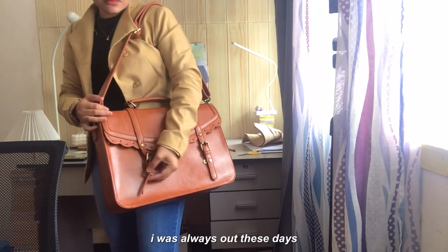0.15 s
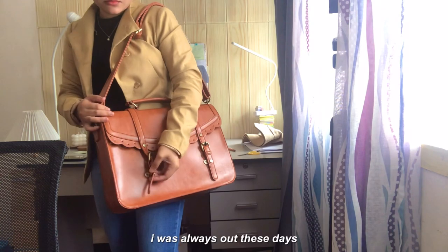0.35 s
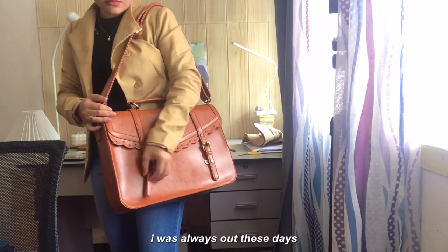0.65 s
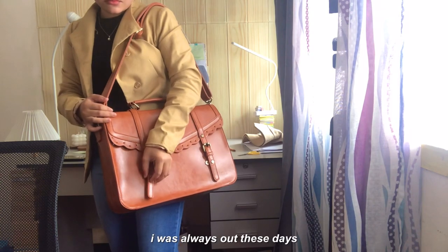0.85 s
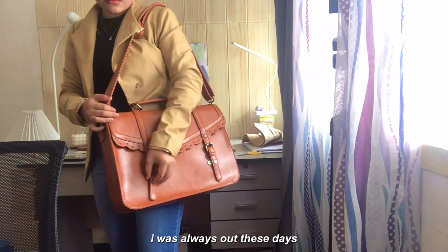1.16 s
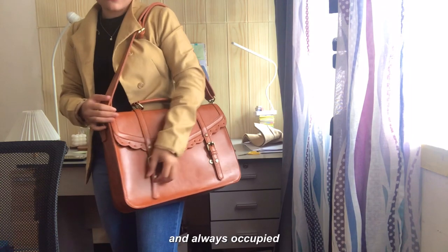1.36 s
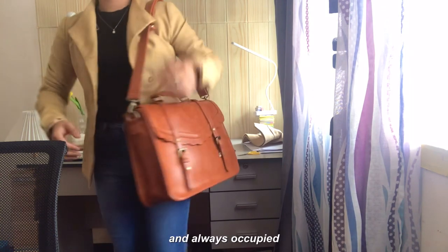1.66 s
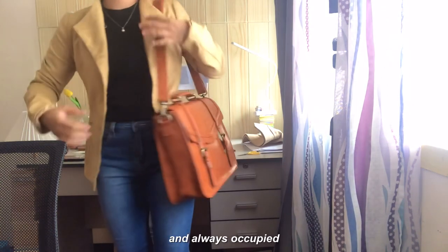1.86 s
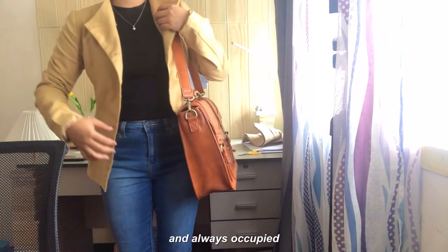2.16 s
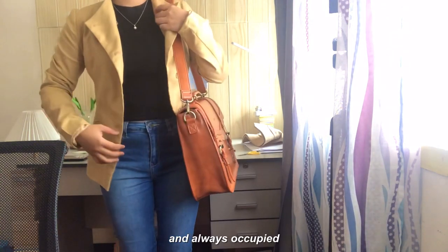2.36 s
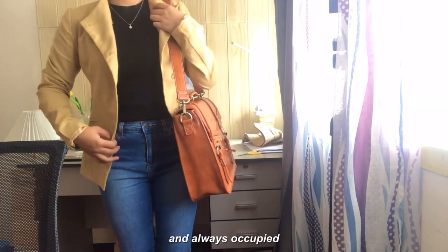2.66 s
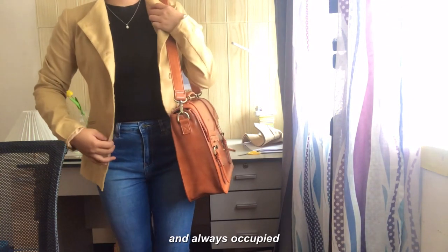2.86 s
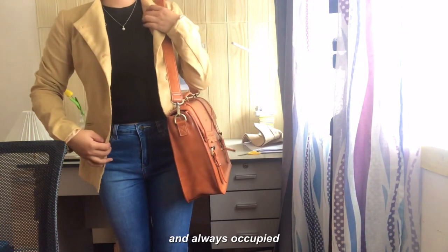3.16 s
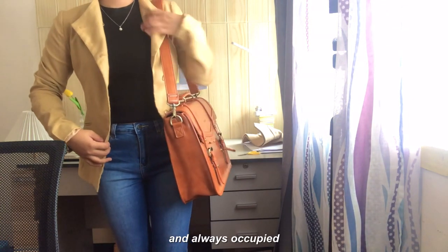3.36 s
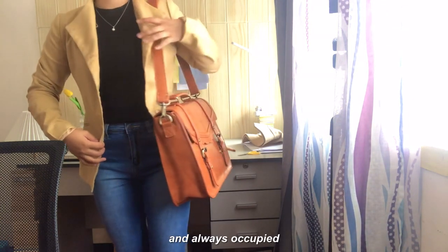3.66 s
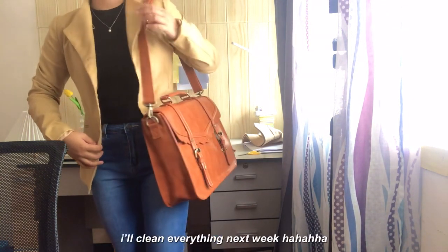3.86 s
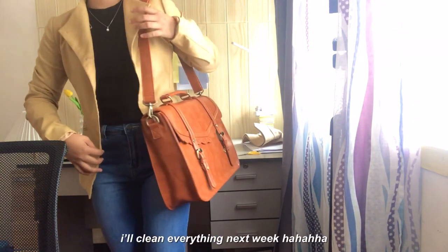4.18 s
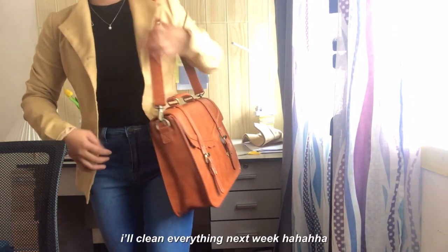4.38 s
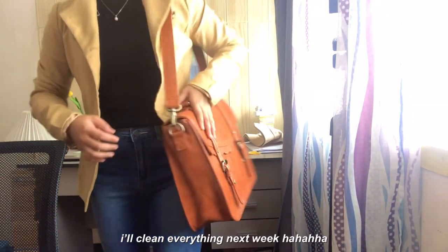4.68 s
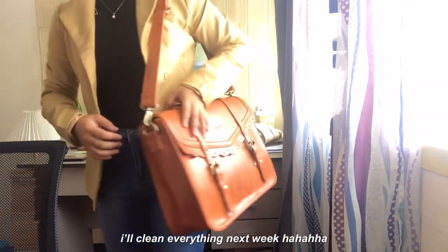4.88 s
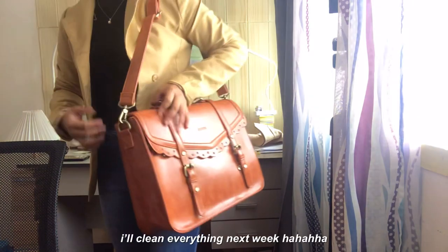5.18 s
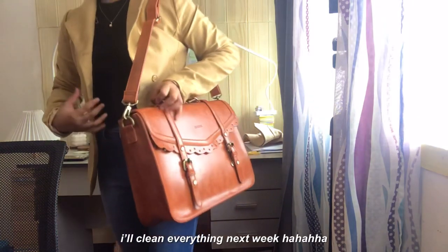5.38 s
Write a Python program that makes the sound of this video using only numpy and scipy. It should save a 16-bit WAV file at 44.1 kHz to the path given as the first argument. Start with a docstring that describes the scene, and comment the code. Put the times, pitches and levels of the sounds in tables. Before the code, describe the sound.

Leather and cloth rustle, a magnetic clasp snaps loudly, then small metal ticks and bumps follow over a rattling fan and sparse rising chirps.

```python
"""A slow four-blade ceiling fan runs throughout: its hum wavers round each turn and its mount rattles.
Within the first second leather creaks, cloth brushes and small metal parts of a leather bag tick.
Just after one second the clasp snaps shut and a bird outside begins to chirp. The bag is then swung
round with more ticks, brushes and bumps, while chirps and fainter peeps return until near the end.
Tones are trembling sine waves; rattles, ticks and rubbing are filtered noise; the thud is fading sines."""
import sys
import numpy as np
from scipy import signal
from scipy.fft import rfft, irfft, next_fast_len
from scipy.io import wavfile
from scipy.ndimage import uniform_filter1d

SR = 44100
rng = np.random.default_rng(int(sys.argv[2]) if len(sys.argv) > 2 else 0)


def pcm_store(signal):
    """Save signal as 16-bit PCM."""
    levels = np.round(np.clip(np.atleast_2d(signal), -1, 1) * 32767)
    wavfile.write(sys.argv[1], SR, levels.astype(np.int16).T)


N = 243873  # length in samples

TURN_HZ = 1.994  # turns of the fan per second
CLASP_S = 1.1088  # moment of the snap


def undb(db):
    """Turn decibels into a gain."""
    return 10 ** (np.asarray(db) / 20)


def unit(x):
    """Scale to an average (rms) level of 1."""
    return x / np.sqrt(np.mean(x ** 2))


def colour(x, points):
    """Shape the spectrum by (Hz, dB) points joined on a log-frequency axis."""
    hz, db = np.transpose(points)
    size = next_fast_len(len(x))
    f = np.arange(size // 2 + 1) * SR / size
    gain = undb(np.interp(np.log(f + 1), np.log(hz), db))
    return irfft(rfft(x, size) * gain, size)[:len(x)]


def band(x, hz, width_hz):
    """Let through one resonance, with gain 1 at its centre."""
    b, a = signal.iirpeak(min(hz, .45 * SR), hz / width_hz, SR)
    return signal.lfilter(b, a, x)


def steep(x, hz, width_hz):
    """Apply the same resonance twice, so its sides fall faster."""
    return band(band(x, hz, width_hz), hz, width_hz)


def walk(rate):
    """Random wandering with rms 1: levels held for 1 / rate seconds, then smoothed twice."""
    hold = int(SR / rate)
    steps = np.repeat(rng.standard_normal(N // hold + 1), hold)
    return unit(uniform_filter1d(uniform_filter1d(steps, hold), hold)[:N])


def grit(spread_db):
    """Noise in which single samples now and then stand out like small slips."""
    return unit(rng.standard_normal(N) * undb(spread_db * rng.exponential(size=N)))


def bursts(times, levels_db, rise_s, fade_s):
    """Loudness curve: each event rises fast and dies by 60 dB in its fade time."""
    t = np.arange(N) / SR
    out = np.zeros(N)
    for s, db, fade in zip(times, levels_db, np.broadcast_to(fade_s, len(times))):
        on = slice(int(s * SR), int((s + fade) * SR))
        age = np.maximum(t[on] - s, 0)
        out[on] += undb(db - 60 * age / fade) * (1 - np.exp(-age / rise_s))
    return out


def swells(rows):
    """Loudness curve: each gesture swells to its peak and fades."""
    swell_db = 22.5  # drop from the peak, one rise before it and one fall after it
    t = np.arange(N) / SR
    out = np.zeros(N)
    for s, rise, fall, db in rows:
        distance = np.where(t < s, (s - t) / rise, (t - s) / fall)
        out += undb(db - swell_db * distance ** 2)
    return out


def spans(tables, column):
    """Gain of one dB column over time, silent between the tables."""
    t = np.arange(N) / SR
    gain = np.zeros(N)
    for table in tables:
        columns = np.transpose(table)
        gain += np.interp(t, columns[0], undb(columns[column]), 0, 0)
    return uniform_filter1d(gain, size=400)


def whistle(calls, waver, flutter_db, rate):
    """A near-sine tone whose pitch and level tremble."""
    rows = np.concatenate(calls)
    pitch = np.interp(np.arange(N) / SR, rows[:, 0], rows[:, 1]) * (1 + waver * walk(rate))
    level = spans(calls, column=2) * undb(flutter_db * walk(rate))
    return np.sqrt(2) * level * np.sin(2 * np.pi * np.cumsum(pitch) / SR)


def echo(x, t60, wet_db):
    """Add a diffuse tail of noise that dies by 60 dB in t60 seconds."""
    t = np.arange(int(t60 * SR)) / SR
    tail = rng.standard_normal(len(t)) * undb(-60 * t / t60) * (t > .003)
    return x + undb(wet_db) * signal.fftconvolve(x, tail / np.linalg.norm(tail))[:N]


# tone colour of the steady hiss: pitch_hz, relative level_db (per Hz)
AIR_COLOUR = [(18, -62), (30, -19.5), (70, -6.5), (124, -3), (204, -12.5), (364, -14), (554, -22.5),
              (889, -20.5), (1860, -26), (2120, -27), (4910, -36), (6720, -38.5), (10200, -48.5),
              (14400, -49.5), (16000, -55)]


def air():
    """Room air and microphone hiss; the mids swell a little as each blade sweeps by."""
    noise = unit(colour(rng.standard_normal(N), AIR_COLOUR))
    sweep = np.cos(2 * np.pi * (4 * TURN_HZ * np.arange(N) / SR - .4))
    mids = band(noise, 1350, 2300)
    mids_gain = undb(0.5 * sweep + 1.84 * walk(4.694))
    return undb(-47.5) * (noise + (mids_gain - 1) * mids)


# wavering low drones of noise: pitch_hz, width_hz (of each of two filter passes), level_db
NOISE_DRONES = [(165.6, 3.3, -57.5), (229.6, 12, -63.5)]
# a lower drone near 58 Hz whose level wavers by chance: time_s, relative level_db
LOW_DRONE_LEVEL = [(0, -57), (.36, -65), (.5, -50), (1.09, -51), (1.23, -66), (1.4, -52), (1.68, -55),
                   (1.76, -62), (1.9, -49), (2.17, -50), (2.27, -60), (2.75, -49.5), (3.22, -70),
                   (3.45, -52), (3.82, -64), (4.05, -49), (4.25, -58), (4.53, -47), (4.86, -64),
                   (5.079, -47), (5.25, -50), (5.4, -68)]
# the turning blades split the hum into side tones: distance from the hum (turn rates),
# relative level_db, angle at which it is in step with the hum (turns)
HUM_SIDES = [(-4, -53.5, .209), (-2, -56.8, .248), (-1, -63.3, .924), (1, -59.6, .937), (2, -59.8, .486),
             (3, -59, .257), (4, -55.7, .151), (5, -61.5, .034), (6, -63.6, .152), (7, -59.7, .129),
             (8, -56.3, .009), (10, -65, .08)]


def hum():
    """Motor tone and side tones beat in a pattern that repeats each turn, over low drones."""
    hum_order, hum_db = 60, -46.2  # the motor tone is 60 times the turn rate
    angle = np.arange(N) / SR * TURN_HZ
    tones = np.zeros(N)
    for k, db, at in [(0, hum_db, 0)] + list(HUM_SIDES):
        tones += undb(db) * np.cos(2 * np.pi * (hum_order * angle + k * (angle - at)))
    wander = undb(0.97 * walk(4.57))
    drones = sum(undb(db) * unit(steep(rng.standard_normal(N), hz, width))
                 for hz, width, db in NOISE_DRONES)
    low_rows = [(s, 58, db) for s, db in LOW_DRONE_LEVEL]  # centred on 58 Hz
    low = whistle([low_rows], waver=0.017, flutter_db=1.6, rate=10)
    return np.sqrt(2) * wander * tones + drones + undb(-1.0) * low


# fainter peeps: start_s, length_s, first_pitch_hz, last_pitch_hz, relative level_db
FAINT_PEEPS = [(2.765, .035, 6600, 6720, -64), (3.331, .17, 2888, 2896, -64.5),
               (3.54, .04, 3170, 3180, -68), (4.63, .04, 7200, 6700, -63),
               (5.277, 0.054, 6500, 7400, -66.5)]


def peep(s, length, from_hz, to_hz, db):
    """One short note: a straight glide that rises, holds and fades."""
    edge = .014 / length  # 14 ms to rise and to fade
    u = np.array([0, edge, 1 - edge, 1])
    level_db = db + np.array([-9, -0.5, -2, -7])
    return np.transpose([s + u * length, from_hz + u * (to_hz - from_hz), level_db])


# bird calls: start_s, glide_s, first_pitch_hz, top_pitch_hz, relative level_db
BIRD_CALLS = [(1.174, 0.093, 5310, 7390, -56.5), (2.82, 0.097, 5400, 7180, -56.5),
              (3.9, .11, 5220, 7200, -55.5)]


def chirp(s, glide, low_hz, top_hz, db):
    """One call: the pitch climbs ever faster to the top and rests there while the level fades."""
    attack_s, tail_s = 0.02, 0.029
    sag_db, top_db, faint_db = -2.5, -6, -7
    u = np.linspace(0, 1, 20)
    age = np.append(u * glide, glide + tail_s)
    hz = np.append(low_hz + (top_hz - low_hz) * u ** 2.1, top_hz)
    level_db = np.interp(age, [0, attack_s, 0.96 * glide, glide, age[-1]],
                         [faint_db, 0, sag_db, top_db, top_db + faint_db])
    return np.transpose([s + age, hz, db + level_db])


def birds():
    """Chirps and peeps are trembling whistles that ring in the yard outside."""
    calls = whistle([chirp(*row) for row in BIRD_CALLS], waver=0.0076, flutter_db=3.8, rate=350)
    peeps = whistle([peep(*row) for row in FAINT_PEEPS], waver=.005, flutter_db=3.5, rate=200)
    return undb(-3) * echo(calls + peeps, .2, 2.5)


# ringing modes of the fan's housing:
# pitch_hz, relative width (scaled to Hz by one common factor), relative level_db
MOUNT_MODES = [(1145, 79, 10.5), (1486, 31, 6), (2093, 36, 9), (2830, 168, 2), (3800, 240, -27),
               (4040, 21, -16), (4390, 8.7, -2), (4250, 39, -47.5)]
# what each of the four blades does to the mount, all relative:
# ring of the lowest mode level_db, treble level_db, knock level_db
BLADE_STRENGTHS = [(-16, -22.5, -8), (-14.5, -22.5, -10), (-12, -22.5, 7.5), (-17, -24.5, -5)]
# the blades pass in turn and shake the mount: time_s, relative level_db
BLADE_PASSES = [(.0438, -50), (.157, -39.5), (.274, -39), (.399, -38.5), (.5294, -44.5), (.6494, -40.5),
                (0.7755, -39), (0.899, -35), (1.0355, -42), (1.1594, -40), (1.275, -41.5), (1.3955, -43),
                (1.5288, -46.5), (1.6627, -37), (1.7698, -42), (1.897, -39), (2.0294, -41.5), (2.1631, -40),
                (2.2794, -42), (2.4036, -47.5), (2.537, -44.5), (2.6711, -42), (2.7813, -40), (2.8991, -43),
                (3.0294, -56), (3.165, -44.5), (3.2794, -36), (3.4009, -38.5), (3.5414, -41), (3.666, -38),
                (3.7765, -44.5), (3.9003, -44.5), (4.0198, -42.5), (4.1664, -36), (4.2847, -38),
                (4.401, -41), (4.5453, -42), (4.671, -39.5), (4.7857, -40), (4.9003, -40.5), (5.044, -37.5),
                (5.1711, -41.5), (5.279, -46.5), (5.398, -47), (5.5148, -43.5)]


def mount():
    """Each blade pass sends a short chatter into the modes of the housing, with a knock inside it."""
    s, db = np.transpose(BLADE_PASSES)
    blade = np.array(BLADE_STRENGTHS)[np.arange(len(s)) % len(BLADE_STRENGTHS)]
    uneven = blade + 1.34 * rng.standard_normal(blade.shape)  # no two passes are quite alike
    low_db, treble_db, knock_db = uneven.T
    chatter = grit(2.1) * undb(2.16 * walk(250))
    rattle = bursts(s - .006, db - 1.5, 0.021, 0.14)
    knock = bursts(s + 0.0013, db + knock_db - 6.0, 0.0017, 0.0096)
    shake = chatter * (rattle + knock)
    body = sum(undb(level + 6) * band(shake, hz, 2.39 * width) for hz, width, level in MOUNT_MODES)
    body = body + undb(7) * steep(shake, 1560, 3600)
    # stretching the levels makes the lowest mode favour the hard strikes
    low_hits = bursts(s, 1.474 * (db + low_db) + 54.0, 0.0028, 0.16)
    low = band(chatter * low_hits, 896.3, 24.0)
    treble_hits = bursts(s - .002, db + treble_db, 0.0057, 0.21)
    treble = undb(16) * steep(chatter * treble_hits, 4360, 3500)
    return steep(body, 2560, 7000) + low + treble


# cloth brushes as the bag swings, and one brief rustle right after the tick at 3.283 s: peak_s, rise_s, fall_s,
# relative level_db
CLOTH_BRUSHES = [(.62, 0.087, .12, -61), (.91, .07, .05, -66.5), (.985, .03, 0.049, -61.5),
                 (1.48, 0.1, .06, -65.5), (1.74, 0.066, .11, -59.5), (2.22, .09, 0.14, -68),
                 (3.287, 0.0036, 0.052, -62), (4.175, 0.041, .04, -67), (4.29, 0.096, 0.066, -68),
                 (4.54, .06, 0.086, -65.5), (4.63, .03, .09, -66), (5.235, .08, 0.044, -65)]
# leather creaks and scuffs: peak_s, rise_s, fall_s, level_db
LEATHER_CREAKS = [(.63, .1, 0.11, -46), (.76, .03, .025, -52.5), (1.41, 0.035, .05, -57),
                  (1.49, .05, 0.037, -57.5), (1.69, 0.11, 0.12, -55.5), (3.008, 0.015, 0.074, -44.5),
                  (4.67, 0.095, 0.057, -53.5)]
# the bag bumps hand and hip: peak_s, rise_s, fall_s, relative level_db
BAG_BUMPS = [(.67, 0.23, 0.18, -41.5), (3.03, .05, 0.036, -49), (4.52, 0.046, .03, -53),
             (4.59, 0.08, .07, -51)]


def handling():
    """Cloth hisses, leather slips in uneven grains, the bag bumps hand and hip."""
    cloth_colour = [(1500, -10), (4000, -1), (7500, 0), (10300, -6), (12500, -4), (16000, -5)]
    cloth = unit(colour(grit(1.5), cloth_colour)) * undb(1.5 * walk(60))
    slips = grit(3.16) * undb(2.7 * walk(130))
    leather = unit(steep(slips, 1400, 1500) + .5 * steep(slips, 650, 600))
    thump = unit(steep(rng.standard_normal(N), 242, 354)) * undb(0.92 * walk(50))
    # the bag shakes on after the snap
    brush = swells(CLOTH_BRUSHES) + bursts([CLASP_S], [-43], .003, 0.12)
    bump = swells(BAG_BUMPS) + bursts([CLASP_S], [-29], .008, 0.13)
    return undb(3.0) * brush * cloth + swells(LEATHER_CREAKS) * leather + bump * thump


# small metal parts of the bag tick: start_s, relative level_db, relative top octave level_db
METAL_TICKS = [(0.3165, -54, -64), (0.4782, -45, -54), (0.5792, -34, -58), (0.6137, -36, -56),
               (0.6474, -32, -56), (0.849, -38, -58), (0.8728, -26.5, -52), (0.9088, -30, -64),
               (0.9667, -43, -56), (0.985, -34.5, -56), (1.4184, -49, -62), (1.4935, -37, -62),
               (1.692, -25.5, -70), (2.7822, -36, -61), (3.2831, -28, -52), (3.777, -32.5, -49),
               (4.233, -45, -61), (4.5047, -37, -68), (4.556, -32.5, -56), (4.594, -39, -60),
               (4.631, -36, -57)]


def ticks():
    """Each tick is a short spit of noise in the low treble and in the top octave."""
    s, db, top_db = np.transpose(METAL_TICKS)
    fade_s = .011
    low = steep(rng.standard_normal(N) * bursts(s, db, 0.00063, fade_s), 4160, 5200)
    top = steep(rng.standard_normal(N) * bursts(s, top_db, 0.00019, fade_s), 12800, 9000)
    return undb(0.5) * low + undb(8.0) * top


# tones of the bag's hollow body: pitch_hz, relative level_db, time to die by 60 dB (s)
HOLLOW_BODY = [(307, -0.5, 0.037), (633, -13, 0.042), (1016, -5.5, 0.014)]
# tone colour of the crack: pitch_hz, relative level_db (per Hz)
CRACK_COLOUR = [(290, -19), (500, -10), (919, 1.5), (2360, -18), (3590, -0.5), (4090, 4.5), (4870, -22),
                (5800, 3), (7640, -24), (8700, -23), (11300, -13), (15100, -18), (16000, -26)]
# ringing modes of the clasp's metal: pitch_hz, width_hz, relative level_db
METAL_MODES = [(3360, 90, 6), (4200, 83, 7), (4780, 80, 8), (5230, 120, -5), (5510, 200, 14),
               (7100, 100, -3), (7400, 92, 5.5), (11600, 1200, -4)]


def clasp():
    """The magnet snaps shut: a crack, the bag's hollow thud and the metal's rough short ring."""
    t = np.maximum(np.arange(N) / SR - CLASP_S, 0)
    contact = np.sin(np.pi * np.minimum(t / .0021, 1)) ** 2  # one hump of 2.1 ms
    crack = unit(colour(rng.standard_normal(N), CRACK_COLOUR)) * contact
    shiver = rng.standard_normal(N) * bursts([CLASP_S], [-17], 0.0014, 0.17)
    ring = sum(undb(db) * band(shiver, hz, width) for hz, width, db in METAL_MODES)
    ring = ring + undb(-4.0) * steep(shiver, 4400, 4200)
    # the body answers as the contact ends
    late = np.maximum(t - .0019, 0)
    thud = sum(undb(db - 60 * late / t60) * np.sin(2 * np.pi * hz * late) for hz, db, t60 in HOLLOW_BODY)
    return undb(-17) * (crack + ring + undb(-2.5) * thud)


def scene():
    """Fan, bag and clasp in one small room, with the birds outside."""
    near = echo(mount() + handling() + ticks() + clasp(), 0.15, -10)
    return (air() + hum() + birds() + near)[None]


# dips in the overall tone colour: pitch_hz, width_hz, share removed (0 to 1)
TONE_DIPS = [(4950, 360, 0.46), (8460, 1700, 0.26), (10430, 660, 0.31)]


def record(dry):
    """The overall tone dips at a few pitches and the top is cut."""
    for hz, width_hz, share in TONE_DIPS:
        dry = dry - share * band(dry, hz, width_hz)
    top_cut = signal.ellip(10, .2, 80, 15850, fs=SR, output="sos")  # steep cut above 15850 Hz
    return signal.sosfilt(top_cut, dry)


dry = scene()
out = record(dry)
pcm_store(out)
```